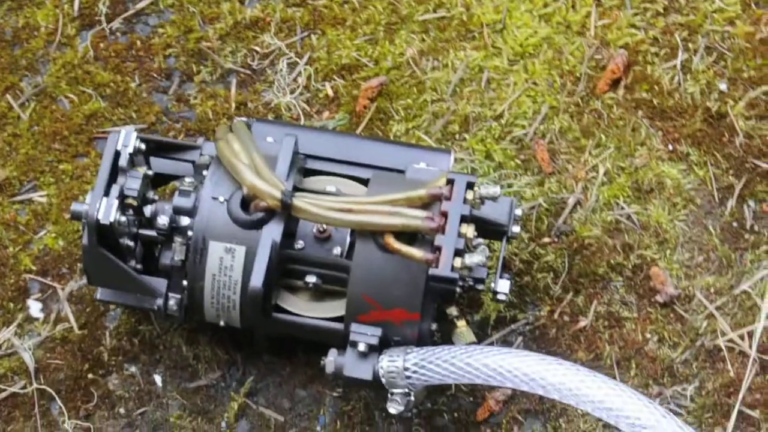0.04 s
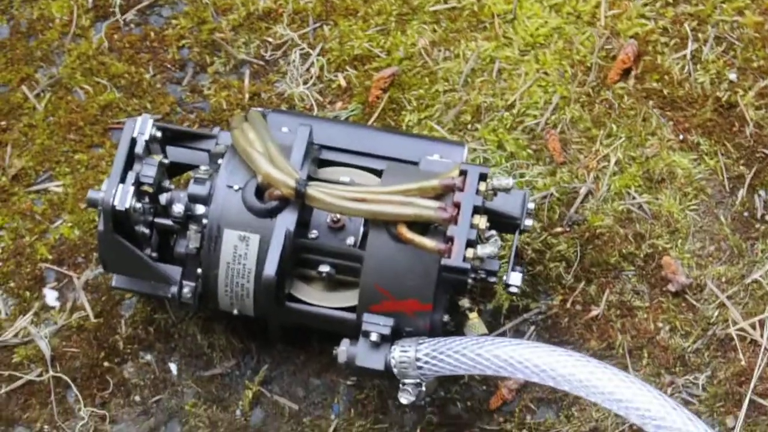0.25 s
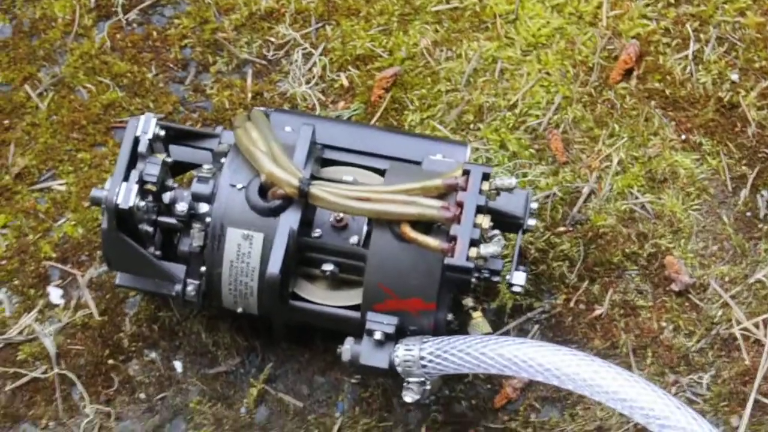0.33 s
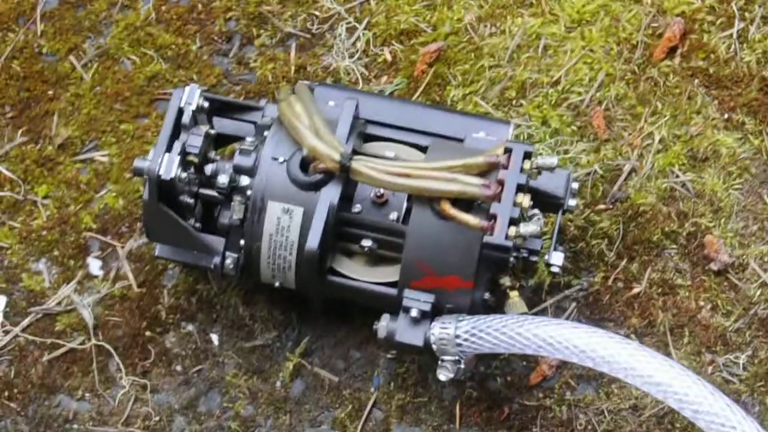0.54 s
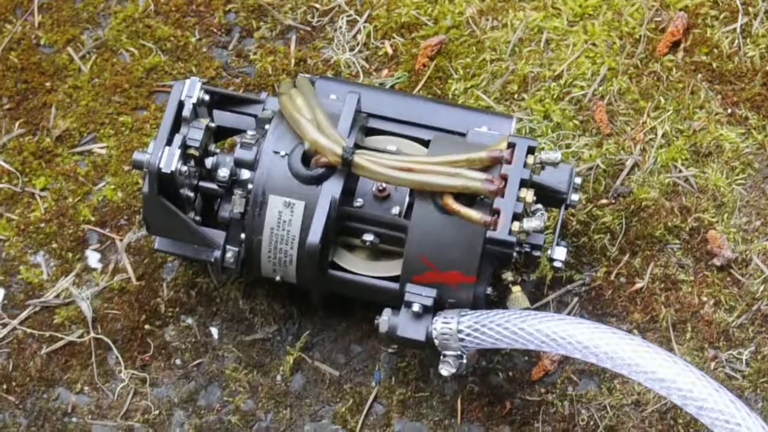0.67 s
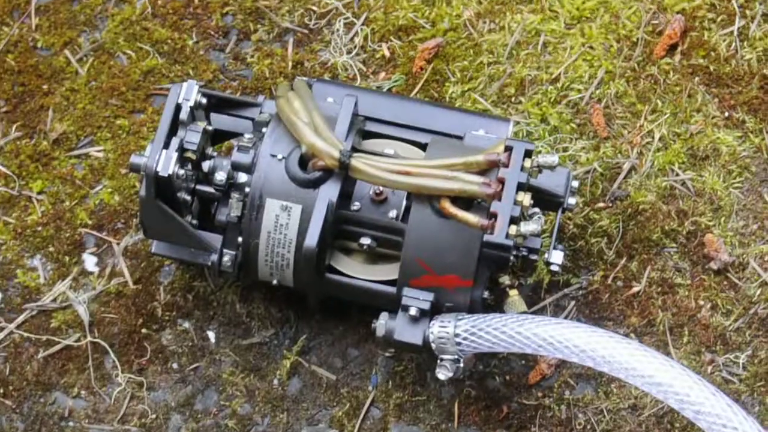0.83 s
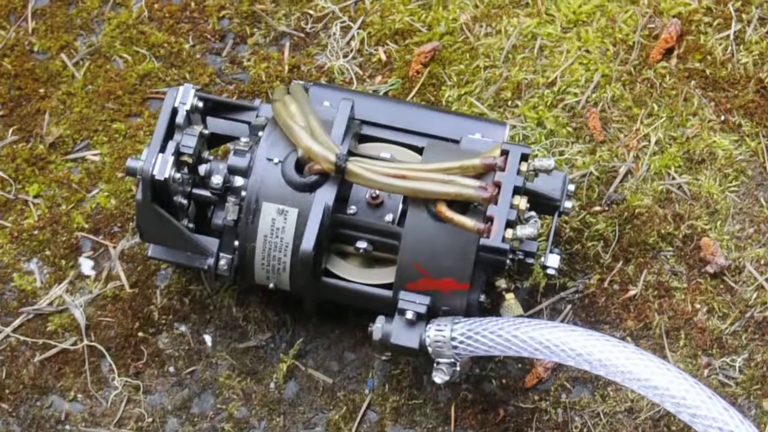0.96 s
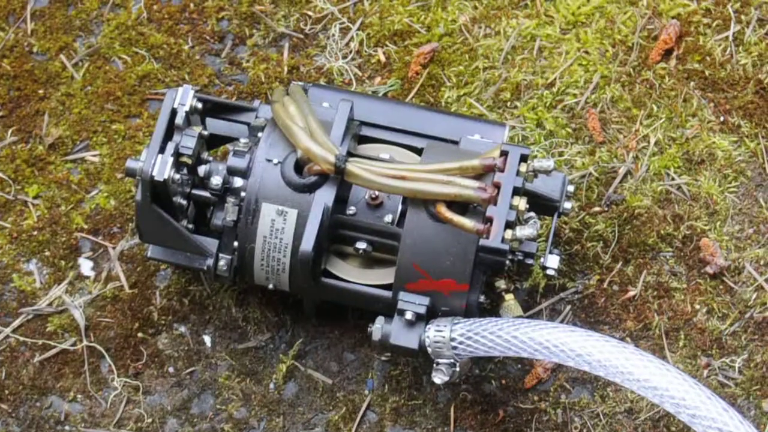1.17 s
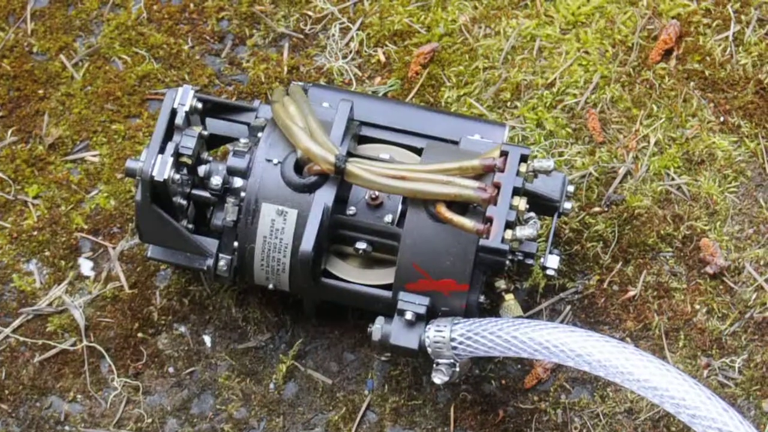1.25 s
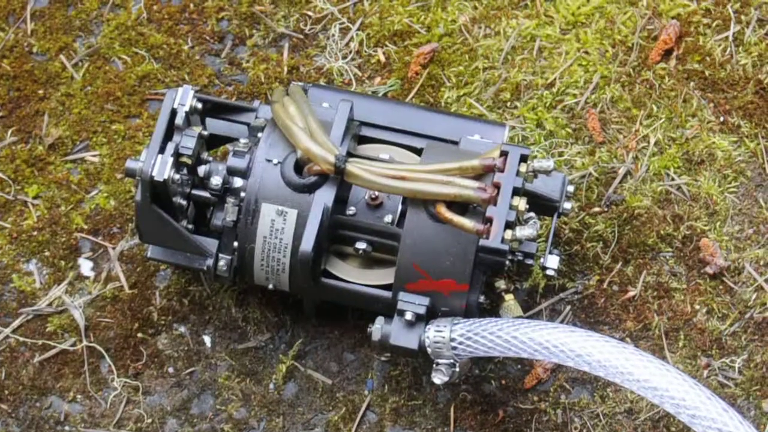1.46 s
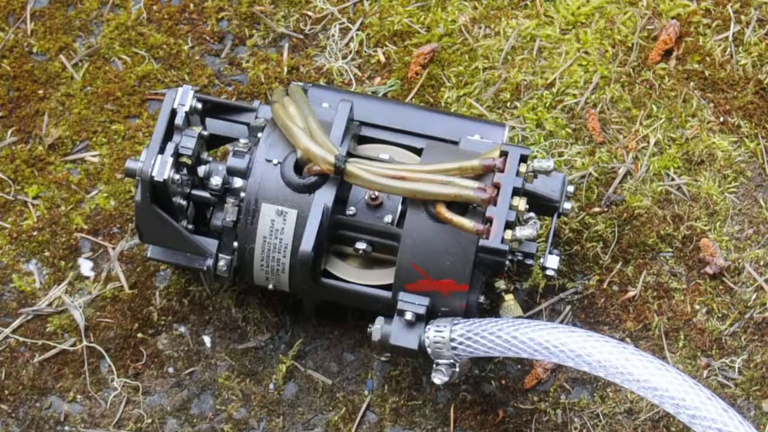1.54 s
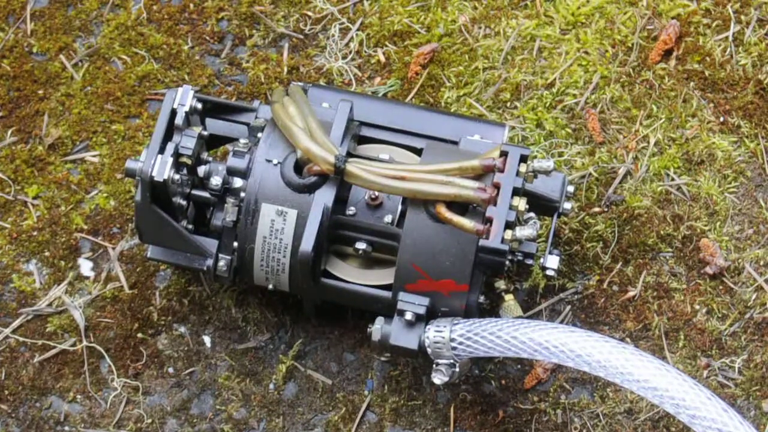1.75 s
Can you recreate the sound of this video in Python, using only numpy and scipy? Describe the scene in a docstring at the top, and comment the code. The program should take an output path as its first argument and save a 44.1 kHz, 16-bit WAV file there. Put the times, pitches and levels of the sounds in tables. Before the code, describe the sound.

Steady whirring whine of a fast rotor with escaping air hiss and a thin high whistle, near and dry in the open; low handling rumble and two heavy, muffled microphone bumps in the first half, then quiet handling.

```python
"""Outdoors, close to the ground: an air-driven gyroscope whirs by a hand-held camera, its rotor slowly losing speed.
The rotor sings a stack of sine partials locked to its turning, topped by a thin whistle; its bearings
add an unsteady tone and bands of rough noise, and spent air hisses out of the frame as coloured noise.
Two soft bumps, built from decaying low modes, overload the two-port microphone, with fainter ones
between and after; dull scuffs and a dying handling rumble are shaped noise."""
import sys
import numpy as np
from scipy import signal
from scipy.fft import rfft, irfft
from scipy.io import wavfile

SR = 44100
rng = np.random.default_rng(int(sys.argv[2]) if len(sys.argv) > 2 else 0)


def dump_mix(stems):
    """Bounce the given channels to the path in sys.argv[1] as a 16-bit WAV at rate SR."""
    frames = np.atleast_2d(stems).T  # one column per channel
    limited = np.clip(frames, -1, 1)  # hard clip at full scale
    pcm = np.round(limited * 32767).astype(np.int16)
    wavfile.write(sys.argv[1], SR, pcm)


N = 79380  # samples, 1.8 s

# Handling rumble in the camera. Each row: time in seconds, level in dB (mean of both ports).
RUMBLE_LEVEL = [(0, -39), (.15, -33.5), (.3, -34), (.45, -23), (.68, -30), (.81, -42), (.97, -37),
                (1.12, -44.5), (1.2, -50.5), (1.8, -51.5)]
# Colour of that rumble. Each row: frequency in Hz, relative level in dB.
RUMBLE_COLOUR = [(10, -29), (22, 10), (45, 2), (80, -6), (120, -19), (250, -41), (600, -68)]
RUMBLE_PAN_DB = 2  # left over right

# Scuffs of the hand on the camera body. Each row: start in seconds, peak level in dB (mean of both ports).
SCUFFS = [(0.244, -32), (.268, -42.5), (.331, -48), (0.501, -28), (0.538, -39.5), (.603, -62)]
SCUFF_RISE_S, SCUFF_CUTOFF_HZ, SCUFF_PAN_DB = .007, 360, 7

# Bumps on the camera. Each row: start in seconds, level in dB.
BUMPS = [(.2318, 0), (.41, -22), (.4931, .7), (.86, -38), (.95, -35)]
# Low modes the camera rings with. Each row: frequency in Hz, rise in seconds, decay time in seconds,
# left level in dB, right level in dB (both relative to the bump).
BUMP_MODES = [(61.2, .018, .0136, 1, -1), (49.1, .0246, .046, -.8, -30), (42.5, .01, .034, -30, -14),
              (131, .014, .02, -18, -26)]

# Gyroscope levels below are those ahead of the shading at the microphone ports.
# Escaping air. Each row: frequency in Hz, noise density in dB per Hz.
AIR_COLOUR = [(150, -82.5), (350, -82), (640, -78.5), (850, -73.5), (1100, -74), (1300, -67), (1530, -75),
              (1900, -68.5), (2250, -67), (2550, -69.5), (2800, -76.5), (3500, -74.5), (4000, -75.5),
              (4400, -73), (4800, -64.5), (5200, -73), (6600, -77), (7650, -74.5), (8400, -70.5),
              (9200, -74), (10200, -74.5), (10850, -80), (11500, -74), (12700, -77.5), (14000, -80),
              (15600, -84)]
# Likeness of the hiss at the two ports. Each row: frequency in Hz, correlation from 0 to 1.
PORT_LIKENESS = [(100, 0.7), (300, 0.17), (700, 0.63), (2200, 0.98), (4500, 0.9), (8000, 0.64),
                 (15000, 0.74)]

# Rough bearing noise. Each row: centre as a multiple of the turning rate, width in Hz, level in dB.
BEARING_BANDS = [(15.35, 110, -47), (14.7, 200, -53), (4.16, 70, -51)]
# Tone of the bearing balls. Each row: time in seconds, level in dB.
BALL_TONE_LEVEL = [(0, -36.5), (.25, -55), (.5, -39.5), (.92, -39.5), (1.15, -51), (1.35, -40), (1.8, -58)]
BALL_MULTIPLE = 15.41  # of the turning rate
BALL_SLIP_RAD, BALL_SWELL_DB, BALL_SLIPS_PER_S = .8, 3.5, 55

ROTOR_HZ, SLOWING_HZ_PER_S = 317.45, 5.21  # turning rate at the start, and its loss
SPEED_WANDER, WANDER_PER_S = .00026, 9.2  # wander as a fraction of the speed
# Rotor partials. Each row: multiple of the turning rate, level in dB at mid-scene, growth in dB per second.
PARTIALS = [(2, -62, 0), (3, -50.8, 0), (4, -45.3, 0), (5, -59, 0), (6, -41, -1), (7, -48.8, 0),
            (8, -39.2, .5), (9, -53, 1), (10, -41.8, -1.5), (11, -56, -5), (12, -51.5, 3), (13, -58, 0),
            (14, -44.8, 3.5), (15, -52, -3), (16, -42.5, 1.5), (17, -53.5, 0), (18, -57.5, 0), (19, -52, 2),
            (21, -58, 0), (22, -56, 0), (24, -56, 0), (28, -58, 0), (30, -58, 0)]
SWELL_DB, SWELL_PER_S = 1, 8
FLUTTER, FLUTTER_PER_S = .13, 70  # depth both as a fraction of level and in radians of phase
BUCKETS = 48  # on the rotor
# Whistle of the jet on the rotor's buckets. Each row: time in seconds, level in dB.
WHISTLE_LEVEL = [(0, -53), (.5, -54), (.7, -45), (1.0, -46), (1.1, -49), (1.22, -42.5), (1.8, -43.5)]

PORT_SCATTER_RAD = .35  # largest phase shift of a partial at either port
PORT_LAG_MS = .045  # right port after left
# Shading of the ports by the camera body. Each row: frequency in Hz, left minus right in dB.
PORT_BALANCE = [(60, 0.5), (110, 0.5), (200, 1.0), (380, 0.5), (700, 1.0), (1290, 3.0), (2380, 0.5),
                (4400, -2.5), (8120, 0.0), (15000, 3.5)]
TOP_HZ = 15700


def amp(db):
    """Decibels to gain."""
    return 10 ** (np.asarray(db) / 20)


def unit(x):
    """Scale to rms 1."""
    return x / np.sqrt(np.mean(x ** 2))


def seconds():
    """Time of every sample."""
    return np.arange(N) / SR


def bins():
    """Frequency of every spectral bin."""
    return np.arange(N // 2 + 1) * SR / N


def over_time(table):
    """A table of (seconds, value) joined by straight lines."""
    return np.interp(seconds(), *np.array(table).T)


def over_hz(table):
    """A table of (Hz, value) joined on a log-frequency axis."""
    hz, value = np.array(table, float).T
    return np.interp(np.log(bins() + 1), np.log(hz), value)


def noise(gain):
    """Noise whose density per root Hz follows the gain."""
    spectrum = rfft(rng.standard_normal(N)) * gain
    return irfft(spectrum, N) * np.sqrt(SR / 2)


def walk(rate):
    """Smooth chance of rms 1 that changes about rate times a second."""
    return unit(noise(1 / (1 + (2 * bins() / rate) ** 4)))


def pan(db):
    """Left and right gains for a level difference."""
    return amp(np.array([[1], [-1]]) * db / 2)


def handling():
    """Low rumble of the hand on the camera: independent shaped noise at each port."""
    colour = amp(over_hz(RUMBLE_COLOUR))
    rumble = np.array([unit(noise(colour)) for _ in range(2)])
    return rumble * pan(RUMBLE_PAN_DB) * amp(over_time(RUMBLE_LEVEL))


def scuffs():
    """Short dull rubs as the camera shifts in the hand: low noise that swells and dies within moments."""
    out = 0
    for start, db in SCUFFS:
        age = np.maximum(seconds() - start, 0) / SCUFF_RISE_S
        envelope = age * np.exp(1 - age)  # peaks at 1
        rub = unit(noise(1 / (1 + (bins() / SCUFF_CUTOFF_HZ) ** 4)))
        out = out + amp(db) * envelope * rub
    return out * pan(SCUFF_PAN_DB)


def bumps():
    """Each soft blow sets the camera's low modes swinging: they build for one or two cycles, then die away."""
    out = 0
    for start, db in BUMPS:
        age = np.maximum(seconds() - start, 0)
        for hz, rise, decay, left_db, right_db in BUMP_MODES:
            build = np.minimum(age / rise, 1)
            fade = np.exp(-np.maximum(age - rise, 0) / decay)
            swing = build * fade * np.sin(2 * np.pi * hz * age)
            out = out + amp(db) * amp([[left_db], [right_db]]) * swing
    return out


def air():
    """Spent air hisses through the cavities of the frame, partly alike at both ports."""
    colour = amp(over_hz(AIR_COLOUR))
    alike = np.clip(over_hz(PORT_LIKENESS), 0, 1)
    shared = noise(colour * np.sqrt(alike))
    own = np.array([noise(colour * np.sqrt(1 - alike)) for _ in range(2)])
    return shared + own


def bearings(turns):
    """The rolling balls sing one unsteady tone between the rotor's partials, with bands of rough noise."""
    level = amp(over_time(BALL_TONE_LEVEL) + BALL_SWELL_DB * walk(BALL_SLIPS_PER_S))
    slip = BALL_SLIP_RAD * walk(BALL_SLIPS_PER_S)
    out = np.sqrt(2) * level * np.sin(2 * np.pi * BALL_MULTIPLE * turns + slip)
    for multiple, width, db in BEARING_BANDS:
        phase = 2 * np.pi * multiple * turns
        # two slow chances on a sine and a cosine make a noise band around the multiple
        band = walk(width) * np.sin(phase) + walk(width) * np.cos(phase)
        out = out + amp(db) * band
    return out


def rotor(turns):
    """Partials locked to the shaft, each swelling and fluttering a little, and a thin whistle on top."""
    t, partials = seconds(), 0
    for multiple, db, growth in PARTIALS:
        level = amp(db + growth * (t - t.mean()) + SWELL_DB * walk(SWELL_PER_S))
        phase = 2 * np.pi * (round(multiple) * turns + rng.random())
        phase = phase + FLUTTER * walk(FLUTTER_PER_S)
        phase = phase + rng.uniform(-PORT_SCATTER_RAD, PORT_SCATTER_RAD, (2, 1))
        flutter = 1 + FLUTTER * walk(FLUTTER_PER_S)
        partials = partials + level * flutter * np.sin(phase)
    whistle = amp(over_time(WHISTLE_LEVEL)) * np.sin(2 * np.pi * BUCKETS * turns)
    return np.sqrt(2) * (partials + whistle)  # a sine of rms 1 peaks at root 2


def ports(x):
    """The sound reaches the right port a little late, and the camera body shades each port differently."""
    lag_s = np.array([[0], [PORT_LAG_MS]]) / 10 ** 3
    lag = np.exp(-2j * np.pi * bins() * lag_s)
    return irfft(rfft(x) * lag * pan(over_hz(PORT_BALANCE)), N)


def scene():
    """The slowing gyroscope, heard through two ports; bumps, scuffs and rumble arise in the camera itself."""
    steady_slowing = ROTOR_HZ - SLOWING_HZ_PER_S * seconds()
    speed = steady_slowing * (1 + SPEED_WANDER * walk(WANDER_PER_S))
    turns = np.cumsum(speed) / SR
    gyroscope = rotor(turns) + bearings(turns) + air()
    return ports(gyroscope) + bumps() + scuffs() + handling()


def record(dry):
    """The recorder clips at full scale, then a steep low-pass cuts the top."""
    clipped = np.clip(dry, -1, 1)
    low_pass = signal.ellip(10, .1, 80, TOP_HZ, fs=SR, output="sos")  # ripple .1 dB, stopband -80 dB
    return signal.sosfilt(low_pass, clipped)


dry = scene()
out = record(dry)
dump_mix(out)
```